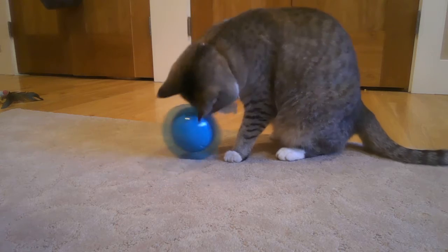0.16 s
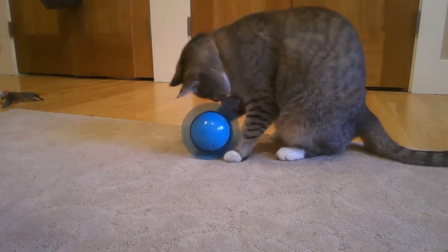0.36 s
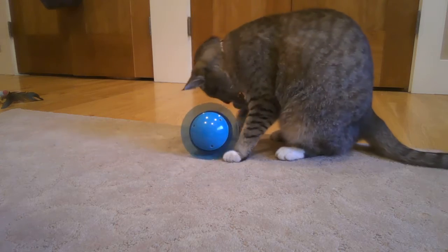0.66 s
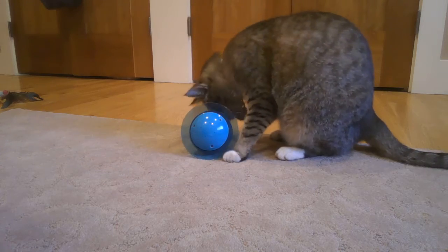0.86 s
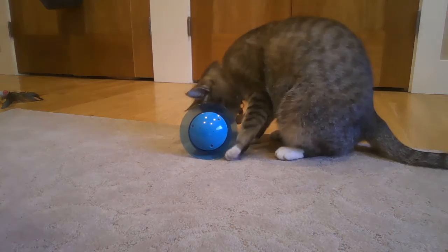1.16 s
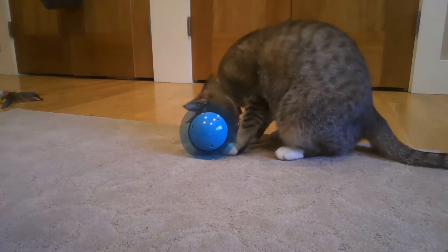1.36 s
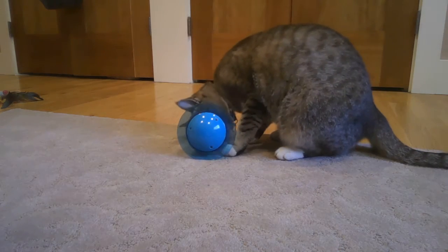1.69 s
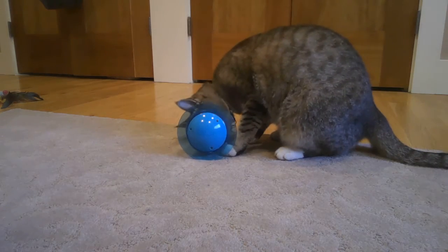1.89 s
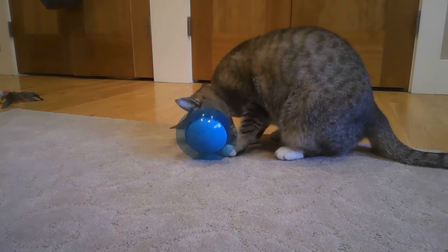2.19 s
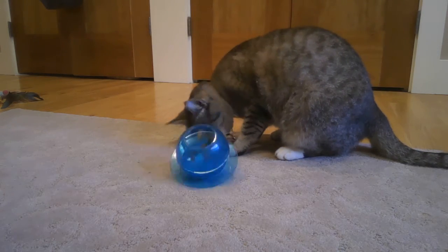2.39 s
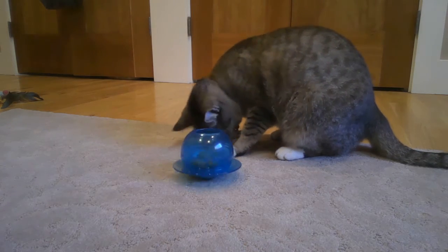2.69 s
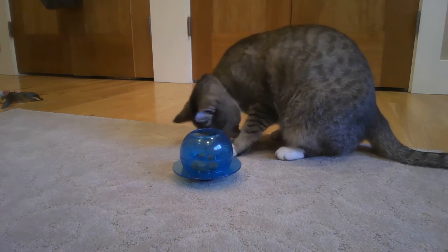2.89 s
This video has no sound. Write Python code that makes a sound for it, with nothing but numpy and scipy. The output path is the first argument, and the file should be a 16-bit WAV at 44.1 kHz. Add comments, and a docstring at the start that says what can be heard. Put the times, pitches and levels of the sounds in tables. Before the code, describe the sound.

A brief crisp rattle of kibble against thin plastic, then room hum and barely audible rubbing on carpet, then a hard hollow clatter as the toy tips upright. Short indoor echo, modest muffled microphone.

```python
"""Treats tumbling in a feeder ball

A cat nudges a hollow plastic ball on a carpet; dry treats inside tumble twice, setting the shell ringing.
Filtered noise makes the ball's rub on the pile and the treats' slide; decaying sines make small lone rings.
Shaped noise makes the low room hum, and a fading noise tail the echo of a furnished room.
A small microphone with a steep treble cut hears it all.
"""
import sys
import numpy as np
from scipy import signal
from scipy.fft import rfft, irfft
from scipy.io import wavfile

SR = 44100
rng = np.random.default_rng(int(sys.argv[2]) if len(sys.argv) > 2 else 0)


def file_out(sig):
    """Save sig as 16-bit WAV at sys.argv[1]."""
    # one column per channel
    cols = np.atleast_2d(sig).T
    # limit, then scale
    lim = np.clip(cols, -1, 1)
    pcm = np.round(lim * 32767).astype(np.int16)
    wavfile.write(sys.argv[1], SR, pcm)


def undo_db(level):
    """Turn decibels back into plain size, where 20 dB means ten times bigger."""
    steps = np.asarray(level, float) / 20
    return 10 ** steps


N = 134505  # length in samples

# Treats striking the shell. Each row: start in seconds, then base levels in dB of the treble modes,
# the bass modes and the mid ring, and the centre of the treble in Hz.
HITS = [(0.0717, -44, -57.5, -85, 5600), (0.1749, -40.5, -81, -81, 5500), (0.2447, -42, -40.5, -49, 3400),
        (0.2636, -38, -39, -49, 4500), (0.2904, -32, -34, -59, 4900), (0.3003, -32, -41.5, -54, 5000),
        (0.315, -18.5, -41.5, -51.5, 5900), (0.3215, -24.5, -41.5, -56, 5500),
        (0.332, -21.5, -35, -43, 5000), (0.342, -17.5, -36.5, -52.5, 6100), (0.3605, -25, -39.5, -57, 5800),
        (0.3699, -34.5, -30, -40, 4800), (0.3904, -15.5, -28.5, -39, 5400),
        (0.3956, -15.5, -37.5, -44, 5900), (0.43, -29, -39, -47, 5700), (0.4404, -32, -42, -48.5, 4400),
        (0.4495, -31.5, -41, -41, 5400), (0.4714, -19.5, -36.5, -45.5, 6000),
        (0.4977, -35.5, -40, -41, 5400), (0.5014, -26, -44, -47.5, 6300), (2.4522, -21, -35, -34.5, 4900),
        (2.4644, -22, -34, -33, 5700), (2.4823, -24, -40, -43, 5700), (2.4921, -21, -26.5, -45.5, 5100),
        (2.5072, -24.5, -30.5, -30, 6100), (2.5529, -28.5, -31, -36.5, 4700),
        (2.5667, -2.5, -21, -23.5, 5000), (2.5800, -6.5, -32, -39, 6100),
        (2.5918, -2.5, -35.5, -31.5, 6500), (2.5970, -7, -28.5, -33.5, 6500), (2.6023, -8, -27, -34, 6000),
        (2.6134, -12, -22, -17.5, 5400), (2.624, -11.5, -20, -16.5, 5700),
        (2.6564, -31.5, -29.5, -51.5, 5600), (2.709, -18.5, -21.5, -24.5, 5600),
        (2.7372, -17.5, -22, -23, 5100), (2.7577, -47.5, -23, -32, 5300), (2.7891, -18, -26.5, -25.5, 6300),
        (2.8, -14, -37, -27.5, 6000), (2.8153, -18, -17, -29.5, 5100)]
# Lower modes of the shell. Each row: pitch in Hz, level in dB added to the hit's bass, 60 dB decay in seconds.
BASS_MODES = [(1188, 3, 0.014), (1305, -1.5, 0.028), (1472, 1.5, 0.013), (1658, -2.5, 0.013),
              (2015, -12.5, 0.019)]
# More such modes, free only while the ball lies on its side, until it tips.
# Each row: pitch in Hz, level in dB added to the hit's bass, 60 dB decay in seconds.
SIDE_MODES = [(940, -10, .02), (2350, -9.5, .015), (2740, -7.5, .015), (3615, -8, 0.044)]
# Mid ring of the shell, first before and then after the ball tips.
# Each row: level in dB added to the hit's ring, 60 dB decay in seconds.
RING_MODE = [(6, 0.016), (1.2, 0.052)]
# Pitch of the mid ring as the ball rocks. Each row: time in seconds, pitch in Hz before a small random detune.
RING_PITCH = [(2.45, 2930), (2.51, 2874), (2.57, 2730), (2.62, 2855), (2.71, 2802)]
# Treble modes of the shell. Each row: pitch in Hz, level in dB added to the hit's treble.
TREBLE_MODES = [(3100, 10), (3650, 9.5), (4200, -1), (4550, 4), (5080, 0.5), (5550, 3.5), (6150, -4),
                (6550, -1), (7300, 2)]
# Loudness of the shell dragged over the pile. Each row: time in seconds, level in dB.
DRAG_LEVEL = [(.9, -95.5), (1.039, -75), (1.1, -65.5), (1.165, -87), (1.199, -76), (1.259, -76.5),
              (1.31, -85), (1.386, -78), (1.42, -103.5), (2.259, -91), (2.324, -57), (2.45, -56),
              (2.5, -87.5)]
# Resonances of that drag. Each row: pitch in Hz, width of one filter pass in Hz, relative level in dB.
DRAG_PEAKS = [(1800, 160, 0), (2390, 120, -9)]
# Loudness of the treats sliding inside. Each row: time in seconds, level in dB.
SLIDE_LEVEL = [(.045, -72), (.075, -53), (0.125, -55), (.17, -74), (0.3, -99)]
# Resonances of that slide. Each row: pitch in Hz, width of one filter pass in Hz, relative level in dB.
SLIDE_PEAKS = [(4150, 230, 5), (5300, 260, -5.5), (6064, 170, -1)]
# Lone rings. Each row: start in seconds, strength in dB, pitch in Hz, 60 dB decay in seconds.
TONES = [(.09, -58, 1995, 0.066), (.31, -44.5, 744, .15), (.43, -42.5, 691.4, 0.14),
         (1.074, -66, 4010, 0.11), (1.577, -47.5, 6750, 0.067), (2.392, -55, 7370, 0.12),
         (2.428, -47, 462, 0.2), (2.575, -40, 630, 0.15)]
# Colour of the room hum. Each row: frequency in Hz, relative level per Hz in dB.
HUM_COLOUR = [(30, -53.5), (75, -30.5), (97, -8), (140, -1), (500, -20.5), (1300, -26), (1600, -34.5),
              (8000, -36.5), (10400, -78)]
# Loudness of the room hum before it wavers. Each row: time in seconds, level in dB.
HUM_LEVEL = [(0, -59.5), (.55, -59.5), (1.0, -66), (1.62, -62), (1.9, -67), (2.35, -61), (2.7, -69)]

TIP_S = 2.3  # when the ball tips off its side
AIR_HZ, AIR_DB, AIR_T60_S = 870, -6.5, 0.066  # air inside the ball as it rings after the tip; before the tip its lower ring is among the lone rings
CHATTER_S, CHATTER_DB = 0.0025, -6  # a treat touches three times within a hit
REBOUND_S, REBOUND_DB = 0.025, -10.5  # lighter treats follow within this time
CONTACT_S, BASS_CONTACT_S = 0.0005, 0.0008  # swell time of the treble and of the other modes
TREBLE_T60_S, TREBLE_SPREAD_OCT = 0.009, 0.24  # treble decay, and its spread around the centre in octaves
MODE_SCATTER_DB, RING_SCATTER = 6.0, 0.01  # random mode strength, and random ring pitch as a fraction


def ring(s, size, hz, t60, contact_s):
    """Contacts of given times and sizes set a decaying sine ringing; it swells over the contact time."""
    sample = np.clip((s * SR).astype(int), 0, N - 1)
    blows = np.bincount(sample, size, N) + 1e-18
    w = 2 * np.pi * hz / SR  # turn per sample
    soft = np.exp(-1 / (contact_s * SR))
    b = [(1 - soft ** 2) / 2, 0, (soft ** 2 - 1) / 2]
    swelling = signal.lfilter(b, [1, -2 * soft * np.cos(w), soft ** 2], blows)
    r = undo_db(-60 / (t60 * SR))  # decay per sample
    return signal.lfilter([0, np.sin(w)], [1, -2 * r * np.cos(w), r * r], swelling)


def mid_ring(s, lag, loss_db, ring_db):
    """One shell mode whose pitch follows the rocking ball, with a small detune for each hit."""
    out = np.zeros(N)
    detune = 1 + RING_SCATTER * rng.standard_normal(len(HITS))
    for start, late, db, off in zip(s, lag, ring_db, detune):
        mode_db, t60 = RING_MODE[int(start[0] > TIP_S)]
        hz = np.interp(start[0], *np.transpose(RING_PITCH)) * off
        out = out + ring(start + late, undo_db(db + loss_db + mode_db), hz, t60, BASS_CONTACT_S)
    return out


def shell_modes(touch_s, loss_db, modes, contact_s):
    """Modes ring together; each touch shares its strength among them anew, with random signs."""
    out = np.zeros(N)
    even = np.array([undo_db(db + loss_db) for _, db, _ in modes])
    size = even * undo_db(MODE_SCATTER_DB * rng.standard_normal(even.shape))
    # keep the total energy of every touch
    size = size * np.sqrt((even ** 2).sum(axis=0) / (size ** 2).sum(axis=0))
    size = size * rng.choice([-1, 1], even.shape)
    for (hz, _, t60), row in zip(modes, size):
        out = out + ring(touch_s.ravel(), row.ravel(), hz, t60, contact_s)
    return out


def treats():
    """Each hit is a quick chatter of three touches and five rebounds that ring the shell and its air."""
    s, treble_db, bass_db, ring_db, centre_hz = np.array(HITS).T[:, :, None]
    lag = rng.random((len(HITS), 8)) * np.r_[0, CHATTER_S, CHATTER_S, [REBOUND_S] * 5]
    loss_db = np.r_[0, CHATTER_DB, CHATTER_DB, [REBOUND_DB] * 5]

    # -200 dB silences a mode
    bass = [(hz, bass_db + db, t60) for hz, db, t60 in BASS_MODES]
    bass += [(hz, np.where(s < TIP_S, bass_db + db, -200), t60) for hz, db, t60 in SIDE_MODES]
    bass += [(AIR_HZ, np.where(s > TIP_S, bass_db + AIR_DB, -200), AIR_T60_S)]

    treble = []
    for hz, db in TREBLE_MODES:
        # weaker the further a mode lies from the hit's treble centre
        off_centre_db = 3 * (np.log2(hz / centre_hz) / TREBLE_SPREAD_OCT) ** 2
        treble.append((hz, treble_db + db - off_centre_db, TREBLE_T60_S))

    out = mid_ring(s, lag, loss_db, ring_db)
    out = out + shell_modes(s + lag, loss_db, bass, BASS_CONTACT_S)
    out = out + shell_modes(s + lag, loss_db, treble, CONTACT_S)
    # thin out the sound below 760 Hz
    return signal.sosfilt(signal.butter(6, 760, "high", fs=SR, output="sos"), out)


def unit(x):
    """Scale to an average strength (rms) of 1."""
    return x / np.sqrt(np.mean(x ** 2) + 1e-30)


def level(rows):
    """Gain over time, drawn through rows of seconds and dB."""
    s, db = np.transpose(rows)
    return undo_db(np.interp(np.arange(N) / SR, s, db))


def rubbed(peaks, rows, grain_db):
    """Gritty noise passes twice through each of some parallel resonances, under a level curve."""
    grain = undo_db(grain_db * rng.standard_normal(N // 200 + 1))  # a new loudness every 200 samples
    grit = rng.standard_normal(N) * grain.repeat(200)[:N]
    out = np.zeros(N)
    for hz, width, db in peaks:
        r = np.exp(-np.pi * width / SR)
        b = [(1 - r * r) / 2, 0, (r * r - 1) / 2]
        a = [1, -2 * r * np.cos(2 * np.pi * hz / SR), r * r]
        once = signal.lfilter(b, a, grit)
        out = out + undo_db(db) * signal.lfilter(b, a, once)
    return unit(out) * level(rows)


def drag():
    """The shell rubs over the carpet pile, as gritty noise through the drag resonances."""
    return rubbed(DRAG_PEAKS, DRAG_LEVEL, grain_db=1)


def slide():
    """Treats slide inside the ball with a thin whisper, as gritty noise through higher resonances."""
    return rubbed(SLIDE_PEAKS, SLIDE_LEVEL, grain_db=1.5)


def tones():
    """Single thin rings: decaying sines that swell softly."""
    out = np.zeros(N)
    for s, db, hz, t60 in TONES:
        out = out + ring(np.array([s]), undo_db([db]), hz, t60, contact_s=0.0015)
    return out


def room(x):
    """A dense tail of reflections, modelled as noise that builds up after each sound and dies ever faster."""
    t = np.arange(SR // 2) / SR
    tail = rng.standard_normal(len(t)) * undo_db(-60 * t / 0.36)  # 60 dB down in 0.36 s, before the next fade
    tail = tail * np.clip(t / 0.012, 0, 1)  # builds up over 12 ms
    tail = tail * np.exp(-(t / 0.155) ** 4)  # fades faster near 0.155 s
    tail = tail / np.sqrt(np.sum(tail ** 2))
    return undo_db(-9) * signal.fftconvolve(x, tail)[:N]


def hum():
    """Low room noise, random noise coloured by frequency and slowly wavering."""
    hz, db = np.transpose(HUM_COLOUR)
    f = np.maximum(np.arange(N // 2 + 1) * SR / N, 1)
    colour = undo_db(np.interp(np.log(f), np.log(hz), db))
    noise = unit(irfft(rfft(rng.standard_normal(N)) * colour, N))
    waver = np.interp(np.arange(N), np.linspace(0, N, 40), rng.standard_normal(40))
    return noise * level(HUM_LEVEL) * undo_db(2 * waver)  # random points spread by 2 dB


def scene():
    """The ball, its echo in the room and the hum, added together."""
    ball = treats() + tones() + drag() + slide()
    return (ball + room(ball) + hum())[None]


def band_limit(x):
    """A steep low-pass at the top of the band."""
    return signal.sosfilt(signal.butter(12, 15750, fs=SR, output="sos"), x)


def record(dry):
    """The microphone rounds loud peaks and cuts the treble steeply; a thin click and faint hiss join."""
    overload = 0.74  # no peak passes this size
    rounded = dry / (1 + (dry / overload) ** 6) ** (1 / 6)
    treble_cut = signal.ellip(10, 0.5, 65, 7500, fs=SR, output="sos")  # 7500 Hz edge, 65 dB down beyond
    mix = signal.sosfilt(treble_cut, rounded)
    mix[:, int(2.5678 * SR)] += undo_db(-38)  # one-sample click by the hardest blow, added after the cut
    mix = mix + undo_db(-82) * rng.standard_normal(dry.shape)  # hiss
    return band_limit(mix)


dry = scene()
out = record(dry)
file_out(out)
```